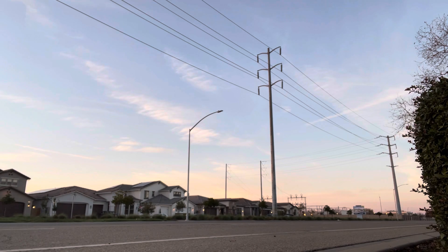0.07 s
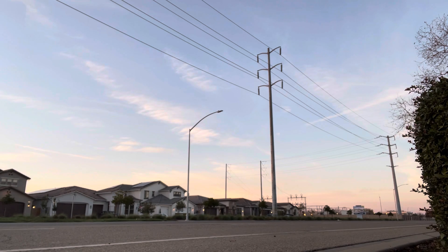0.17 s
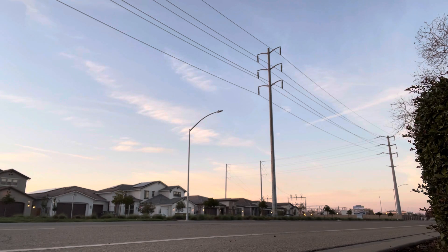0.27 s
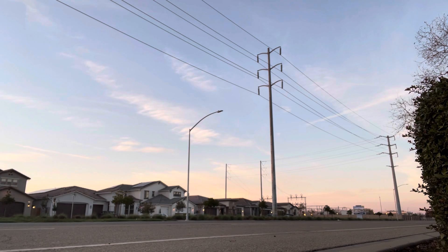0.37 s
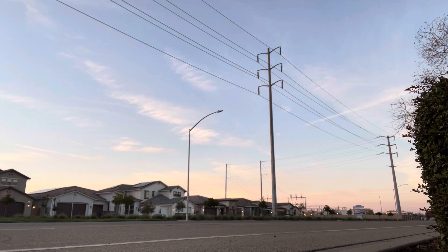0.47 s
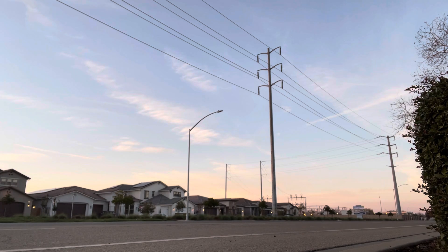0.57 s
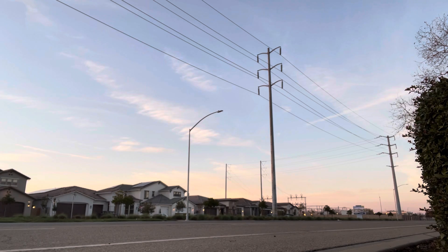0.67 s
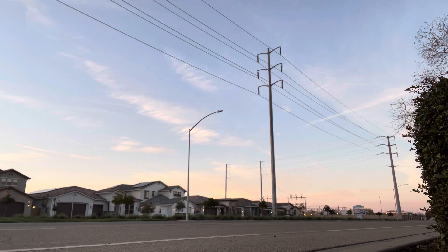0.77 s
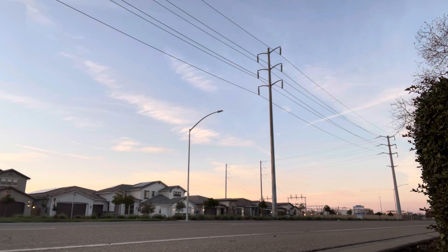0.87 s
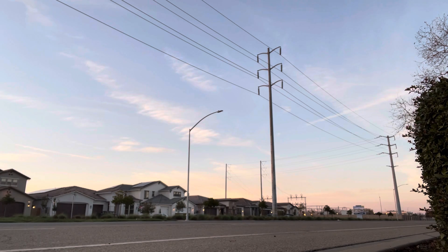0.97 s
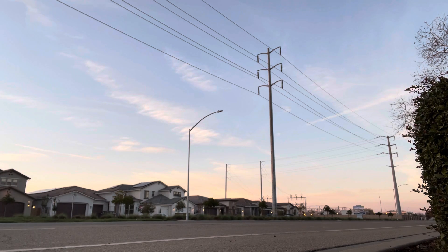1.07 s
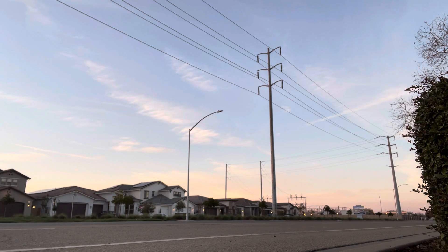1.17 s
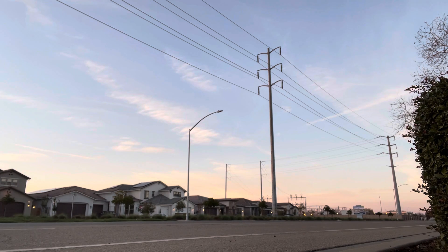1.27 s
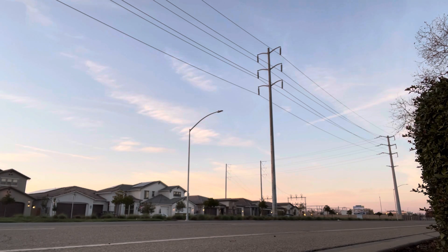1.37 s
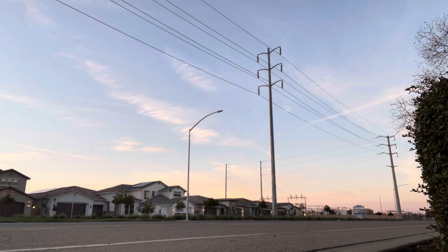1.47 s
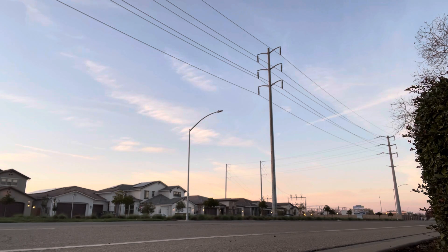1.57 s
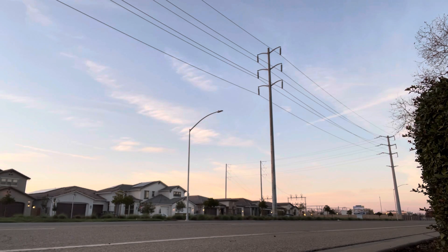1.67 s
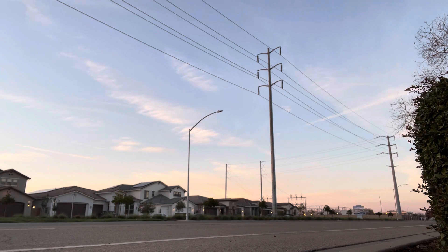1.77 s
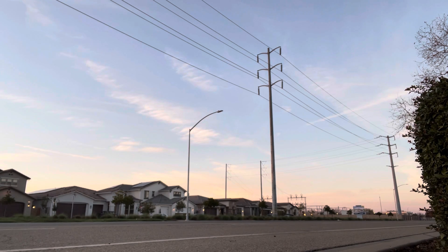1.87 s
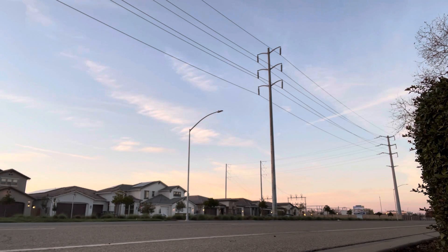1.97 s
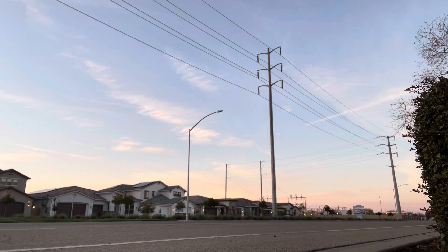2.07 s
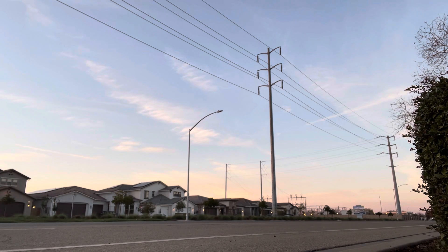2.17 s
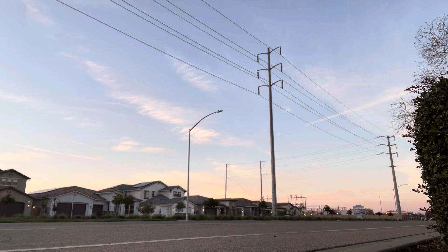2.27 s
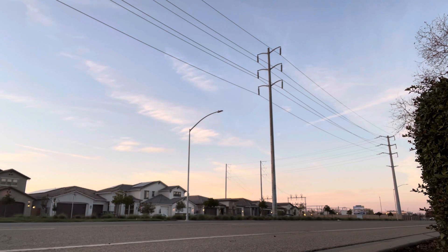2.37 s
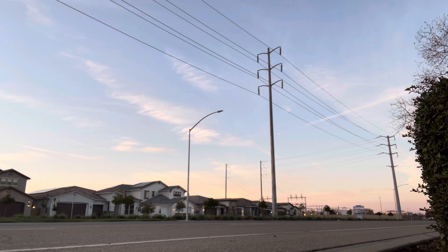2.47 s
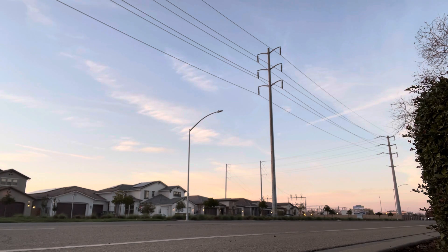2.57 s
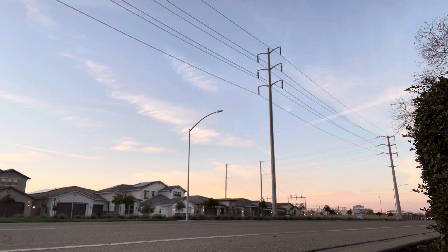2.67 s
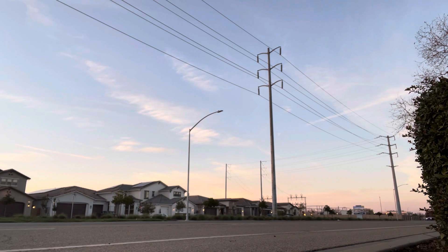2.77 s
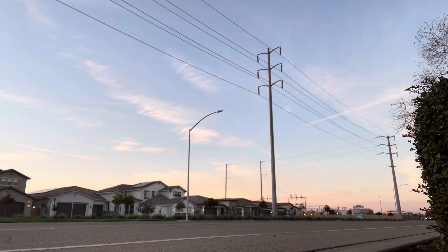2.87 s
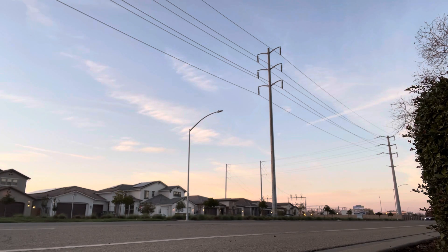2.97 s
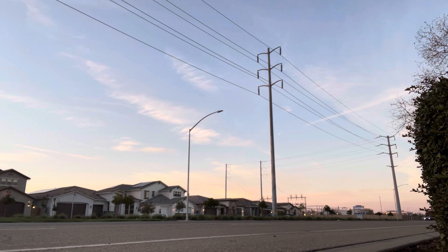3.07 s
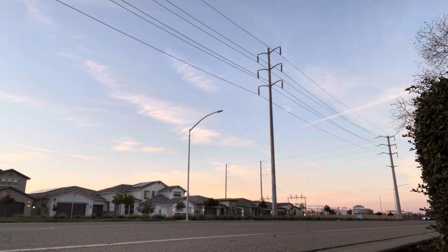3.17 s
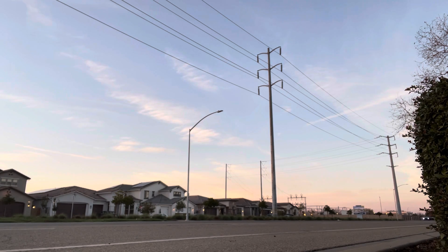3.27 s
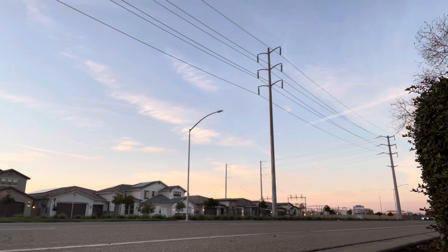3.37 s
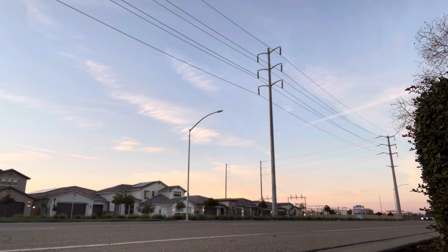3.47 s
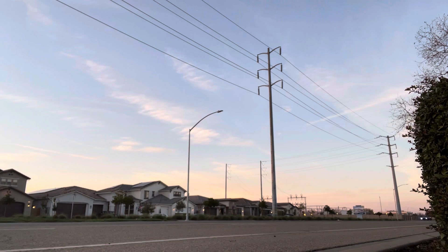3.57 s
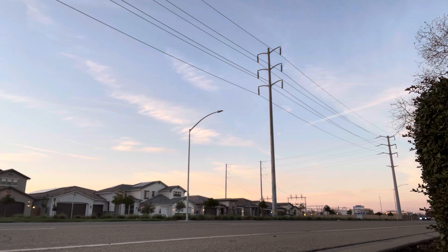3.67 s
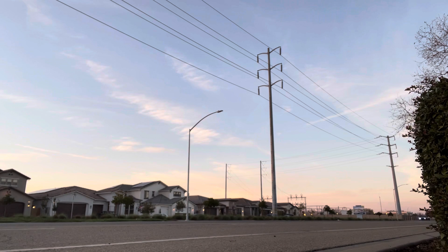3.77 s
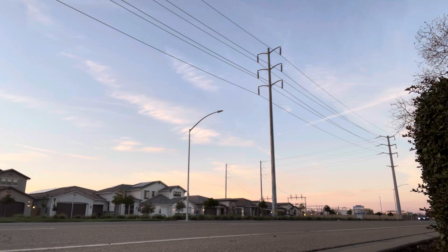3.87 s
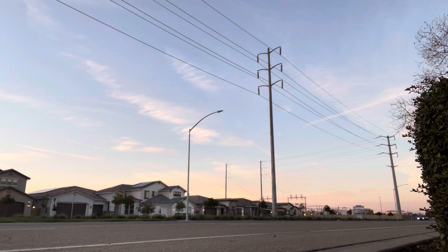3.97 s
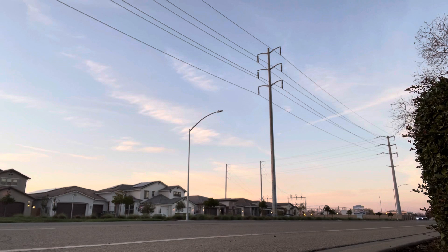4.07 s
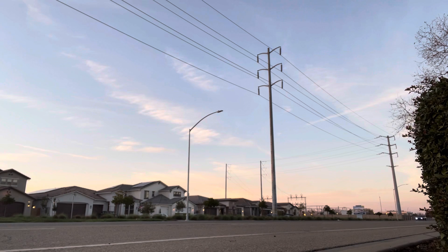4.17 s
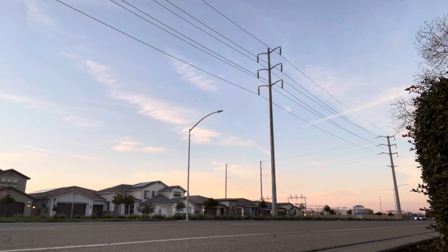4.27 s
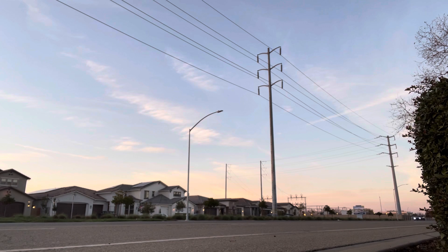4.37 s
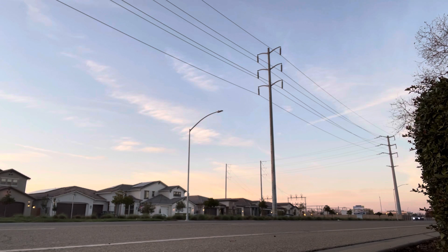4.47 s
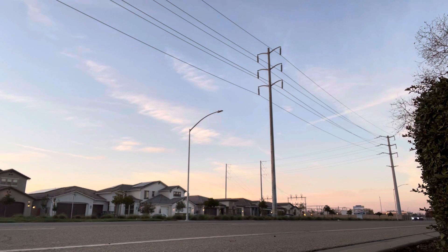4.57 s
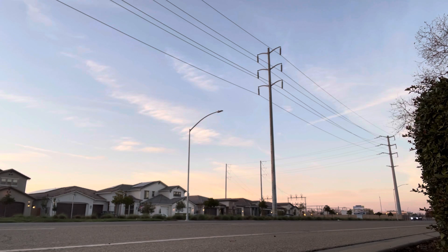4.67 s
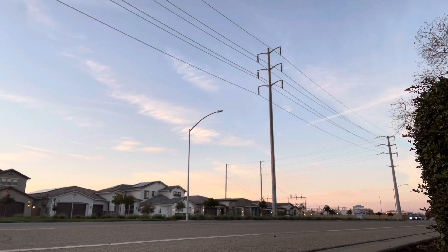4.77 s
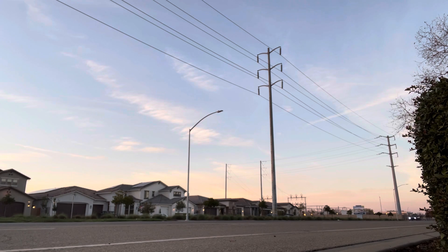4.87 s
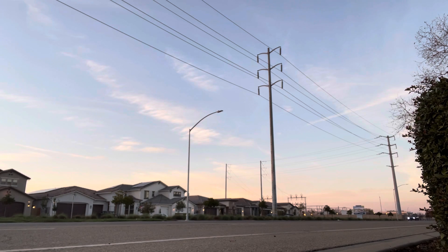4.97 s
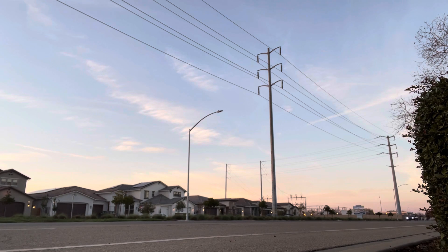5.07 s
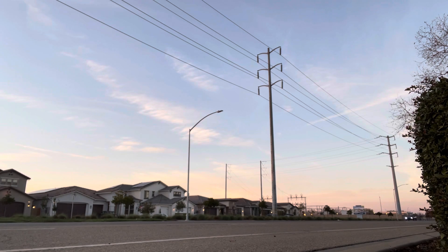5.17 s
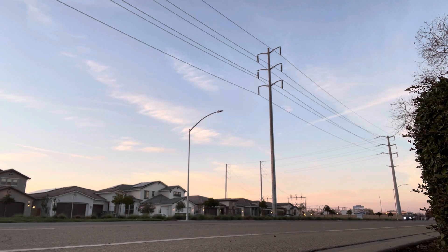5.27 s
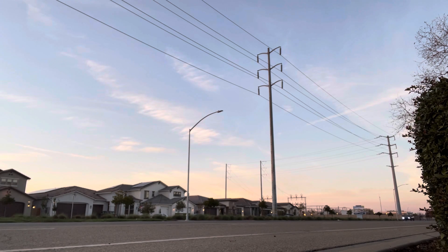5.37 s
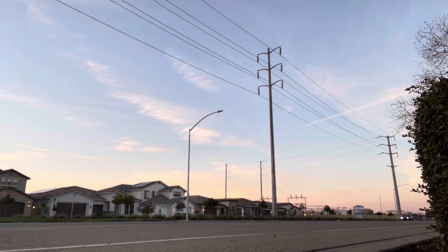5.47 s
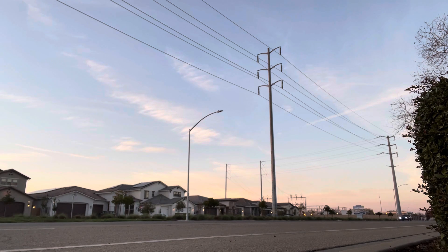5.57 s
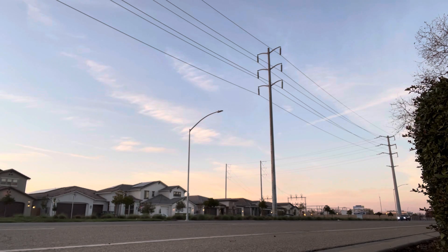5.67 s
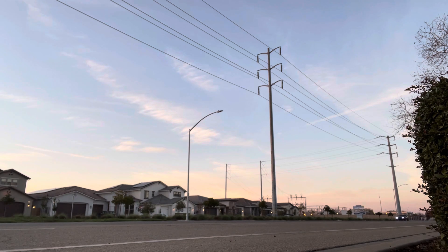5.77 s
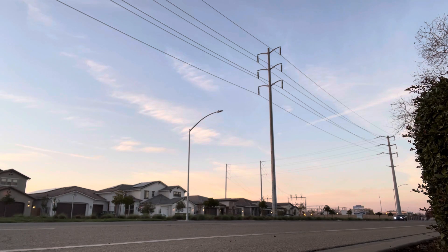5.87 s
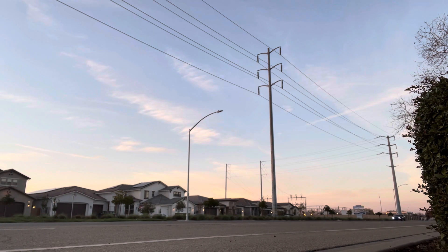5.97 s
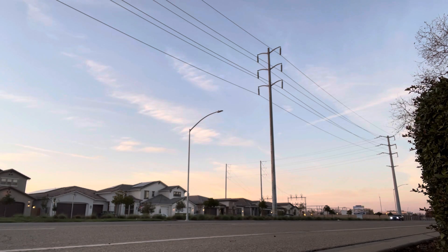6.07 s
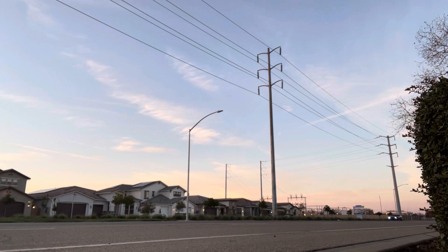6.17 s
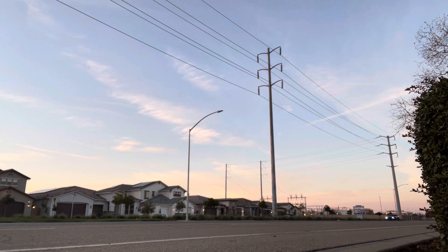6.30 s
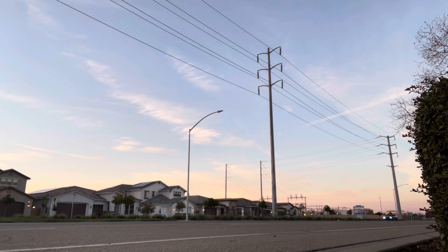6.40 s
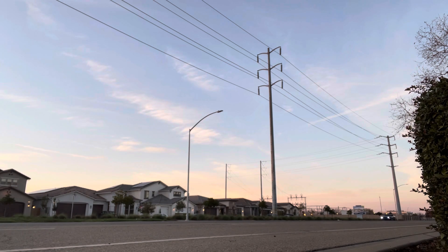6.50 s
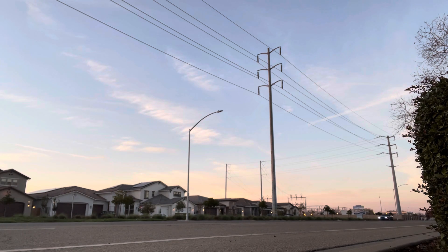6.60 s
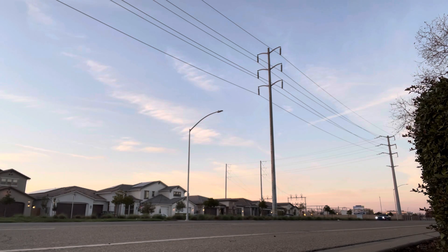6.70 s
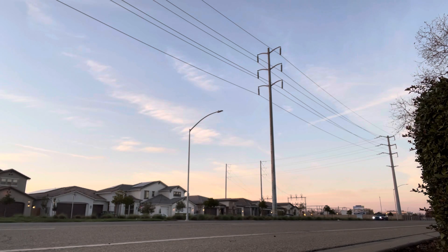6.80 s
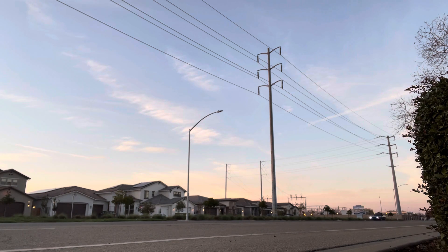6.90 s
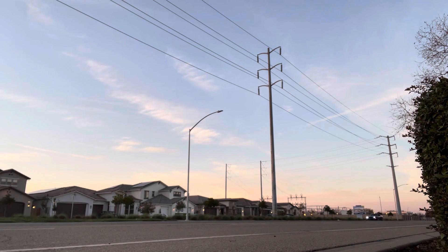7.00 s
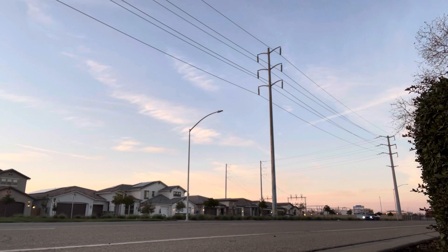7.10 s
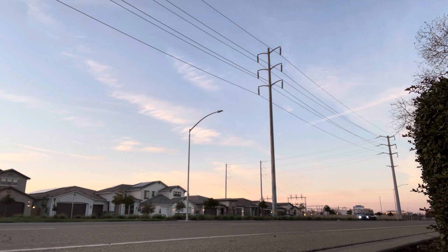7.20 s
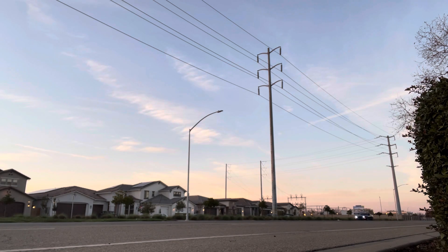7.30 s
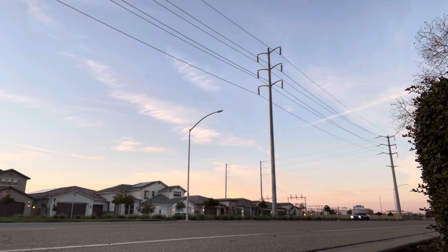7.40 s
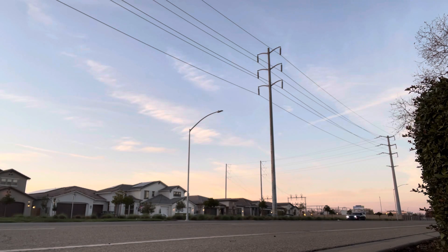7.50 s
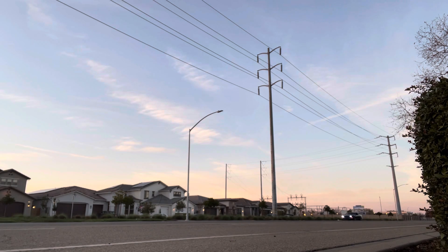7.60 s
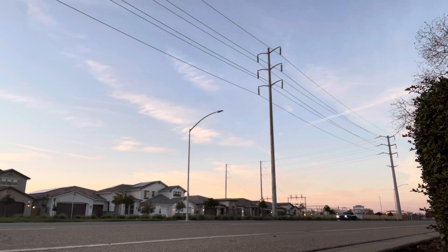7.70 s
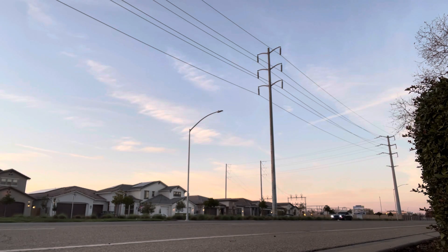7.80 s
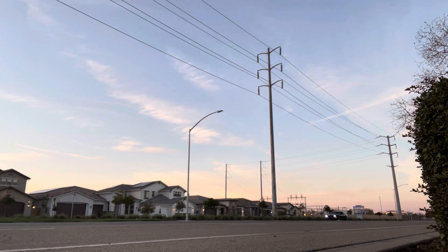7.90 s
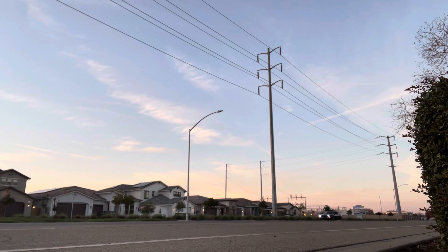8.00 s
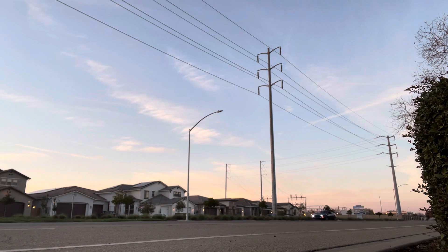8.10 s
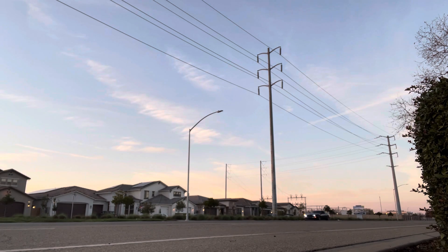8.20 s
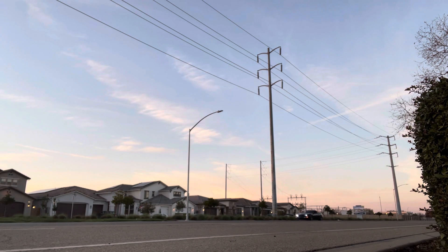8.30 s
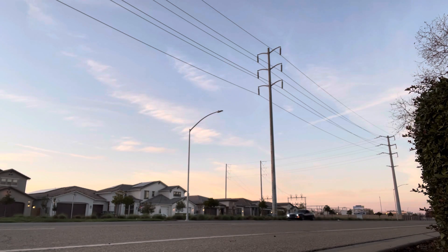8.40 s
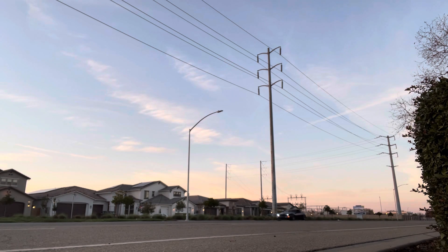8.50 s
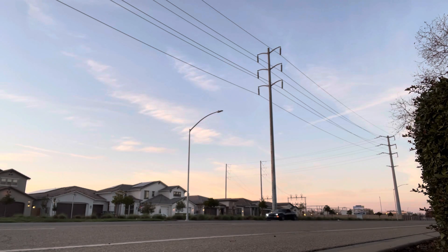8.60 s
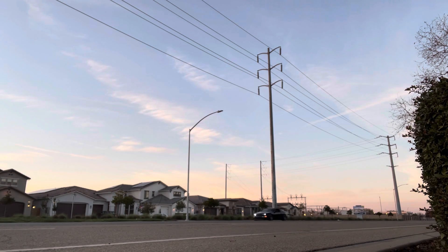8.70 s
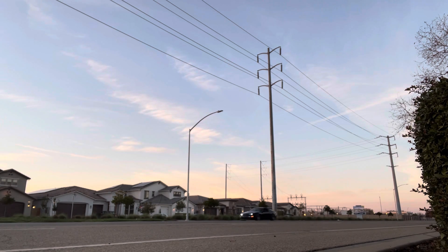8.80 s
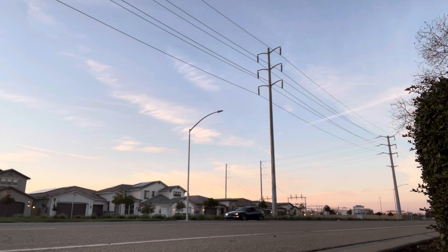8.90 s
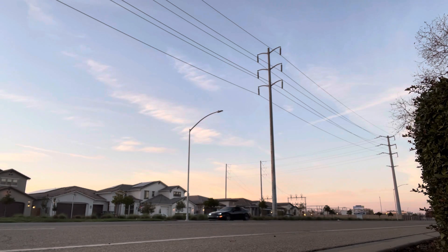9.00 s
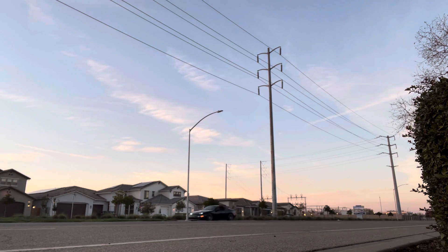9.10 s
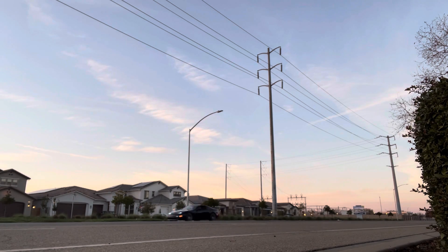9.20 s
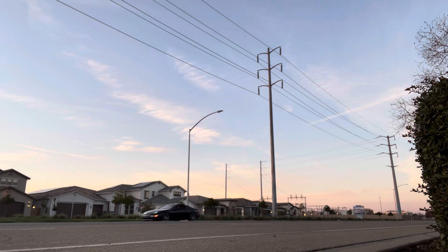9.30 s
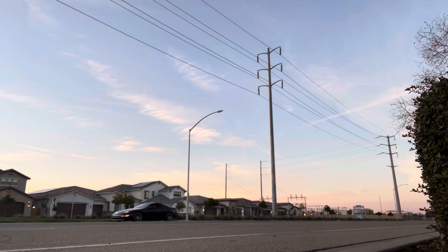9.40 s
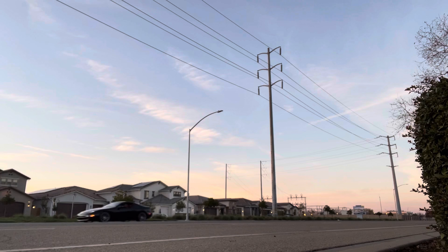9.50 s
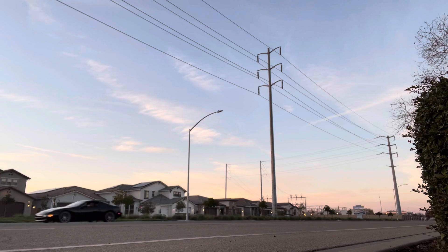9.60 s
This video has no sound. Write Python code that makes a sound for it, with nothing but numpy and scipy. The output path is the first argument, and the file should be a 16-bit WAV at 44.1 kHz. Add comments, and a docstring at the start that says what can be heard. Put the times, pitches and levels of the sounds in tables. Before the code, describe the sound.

A quiet suburban roadside heard from the kerb on a stereo phone. Soft low distant traffic and a steady mains hum run throughout, with faint, short, sometimes buzzy bird notes from nearby trees until about 7.3 s. Around 1.4 s a six-cylinder sports car far to the right blips its throttle, then pulls away; its low, hollow exhaust drone climbs continuously from 2.5 to 6 s, wavering and echoing off walls. A nearer bird gives a clear rising whistle on the left at 4.1 to 4.6 s. At 6 to 6.6 s the car lifts and shifts up, pitch falling, with several muffled exhaust thuds. It pulls again from 6.8 s, louder and raspier, tyre roar growing. Near 8.8 s it lifts off, with heavier thuds until 9.2 s, pitch sagging, tread sizzling around 9.35 s as it sweeps close past towards the left, still loud at the end near 9.6 s.

```python
"""At the kerb, on a phone with two microphone ports: distant traffic, a steady mains hum, and birds calling until
shortly before the car goes by. A V6 sports car far to the right blips, pulls away and revs out; its exhaust
drones on its firing orders, each firing a rasping pulse. It shifts up with late burns thudding in the pipe and
pulls again, tyres roaring, walls and house fronts echoing. Close by it lifts off and thuds again, the tread
sizzles, and it goes by to the left."""
import sys
import numpy as np
from scipy import signal
from scipy.fft import rfft, irfft, next_fast_len
from scipy.io import wavfile
from scipy.ndimage import uniform_filter1d, minimum_filter1d

SR = 44100
rng = np.random.default_rng(int(sys.argv[2]) if len(sys.argv) > 2 else 0)


def store_pcm(level_fs):
    """Save levels as 16-bit WAV."""
    pcm = np.round(np.clip(level_fs, -1, 1) * 32767).astype(np.int16)
    wavfile.write(sys.argv[1], SR, np.atleast_2d(pcm).T)


N = 425565
T = np.arange(N) / SR


def undb(db):
    """Decibels to gain."""
    return 10 ** (np.asarray(db) / 20)


def unit(x):
    """Scale to rms 1."""
    return x / np.sqrt(np.mean(x ** 2))


def curves(table):
    """Each column of a table, joined by straight lines in time."""
    s, *columns = np.transpose(table)
    return [np.interp(T, s, column) for column in columns]


def over_hz(table, hz):
    """Each column of a table, joined on a log-frequency axis."""
    points, *columns = np.transpose(table)
    return [np.interp(np.log(hz + 1), np.log(points), column) for column in columns]


def noise():
    """White noise."""
    return rng.standard_normal(N)


def colour(x, spectrum):
    """Give x a spectrum that falls away beyond its ends; rms 1."""
    size = next_fast_len(N)
    hz = np.arange(size // 2 + 1) * SR / size
    low_end = np.minimum(1, hz / spectrum[0][0]) ** 2
    high_end = 1 / np.maximum(1, hz / spectrum[-1][0]) ** 2
    gain = undb(over_hz(spectrum, hz)[0]) * low_end * high_end
    return unit(irfft(rfft(x, size) * gain, size)[:N])


def walk(rate):
    """Smooth chance of spread 1 that changes rate times a second."""
    step = max(1, int(SR / rate))
    points = rng.standard_normal(N // step + 2)
    joined = np.interp(np.arange(N) / step, np.arange(len(points)), points)
    return unit(uniform_filter1d(joined, step))


def tone(turns, db):
    """A sine of the given rms level on a phase in turns."""
    return np.sqrt(2) * undb(db) * np.sin(2 * np.pi * turns)


def arrive(table, swell_s=.3):
    """A gain that swells from nothing up to the first row of a curve."""
    return np.clip(1 + (T - table[0][0]) / swell_s, 0, 1) ** 3


def bump(s, width_s):
    """A bell-shaped swell of height 1 around a moment."""
    return np.exp(-((T - s) / width_s) ** 2)


# the two microphone ports, for a sound from the right:
# pitch_hz, left_minus_right_db, left_lag_rad, unrelated_share (0 to 1)
PORT_RESPONSE = [(50, 1.5, 0.2, .05), (84.6, 2.8, .2, 0.09), (114, -1.4, 0.35, 0.4), (235, -3.5, 1.64, 1),
                 (540, -5.5, 1.4, 0.93), (990, -9.5, 2.46, 0.16), (1330, -7.5, 2, 0.33),
                 (1980, -0.5, 2.15, 0.2), (2800, 5.5, 3.6, 0.42), (4340, 2, 7.5, 0.22), (8050, 2, 10.6, .2)]


def ports(x, bearing, scattered, shade=0.56, size=1024):
    """Two ports on a phone: the far one hears later and shaded; scattered sound differs between them."""
    hz, s, direct = signal.stft(x, SR, nperseg=size)
    spread = signal.stft(scattered, SR, nperseg=size)[2]
    pan_db, lag, share = (column[:, None] for column in over_hz(PORT_RESPONSE, hz))
    side, share = np.interp(s, T, bearing), np.clip(share, 0, 1)
    direct = direct * np.sqrt(1 - share / 2)
    spread = spread * np.sqrt(share / 2)
    # the ports face different ways, so part of the shading stays for a sound ahead
    pan_db = pan_db * np.minimum(1, shade + side)
    heard = []
    for sign in (1, -1):  # left, right
        shift = np.exp(-.5j * sign * side * lag)
        port = (direct + sign * spread) * undb(sign * pan_db / 2) * shift
        heard.append(signal.istft(port, SR, nperseg=size)[1][:N])
    return np.array(heard)


def houses(x, t60_s, hz, first_s=0.027):
    """House fronts send back a scattered echo that dies 60 dB in t60_s, dull above hz."""
    t = np.arange(SR) / SR
    tail = rng.standard_normal(SR) * undb(-60 * t / t60_s) * (t > first_s)
    tail = signal.sosfilt(signal.butter(2, hz, fs=SR, output="sos"), tail / np.linalg.norm(tail))
    return signal.fftconvolve(x, tail)[:N]


# colour of the distant traffic: pitch_hz, level_db
TOWN_COLOUR = [(25, -25.5), (50, -5), (80, 0.5), (140, 4.5), (190, -14.5), (320, -4.5), (450, -17),
               (620, -19), (900, -13.5), (1250, -17), (1600, -30), (2300, -37), (3500, -58), (12000, -62)]
TOWN_DB, HUM_HZ, HUM_DB = -43, 119.8, -42.5


def town():
    """Distant traffic down the road is coloured noise; the mains hum is one low, slightly wavering sine."""
    direct, scattered = (colour(noise(), TOWN_COLOUR) * undb(TOWN_DB + 0.5 * walk(1.5)) for _ in range(2))
    hum = tone(HUM_HZ * T + 0.043 * walk(8.8), HUM_DB + 1.0 * walk(12.0))
    return ports(direct + hum, np.ones(N), scattered)


# bird notes in the trees: start_s, length_s, start_hz, middle_hz, end_hz, level_db,
# buzz_depth, hoarse_depth (both relative)
BIRD_NOTES = [(.237, .032, 5950, 5250, 6000, -71, 0, 0), (.269, .016, 5600, 5050, 5700, -68, 0, 0),
              (.285, .018, 5500, 4900, 3600, -76, 0, 0), (.503, .016, 4100, 4900, 5300, -75, 0, .3),
              (.526, .03, 5600, 5850, 5650, -64, .9, .3), (1.757, .036, 6100, 5200, 5300, -73, 0, .1),
              (1.792, .026, 5450, 4950, 4600, -70, 0, .1), (1.815, .027, 6700, 6550, 5800, -78, 0, .3),
              (1.86, .06, 4800, 5650, 5450, -70, 1.2, .6), (2.757, .048, 4200, 5400, 5600, -60, .9, .5),
              (3.07, .07, 6000, 5600, 5100, -79, .3, .3), (3.27, .2, 6600, 7100, 7350, -67, 0, 0),
              (3.46, .24, 7100, 7550, 7800, -65, 0, 0), (3.425, .06, 4200, 4350, 4200, -76, .8, .4),
              (3.68, .028, 7850, 7700, 7100, -67, 0, 0), (3.93, .035, 6200, 5900, 5400, -77, 0, .6),
              (4.63, .028, 7950, 7700, 6700, -69, 0, 0), (4.135, .025, 8900, 8700, 8300, -72, 0, .3),
              (4.125, .13, 4700, 3950, 4250, -71, 0, 0), (4.26, .4, 6950, 7750, 7900, -67, 0, 0),
              (5.16, .12, 7000, 7400, 8200, -70, 0, 0), (6.06, .11, 6800, 7300, 8600, -65, 0, .2),
              (6.26, .16, 6000, 6350, 6300, -62, .1, 1), (6.97, .1, 6500, 6950, 8700, -57, 0, .3),
              (7.17, .17, 5900, 6300, 6700, -62, .1, 1), (7.25, .06, 3300, 3250, 2900, -63, 0, .3)]
# a nearer bird's rising whistle: time_s, pitch_hz, level_db
WHISTLE = [(4.12, 2175, -79), (4.19, 2226, -69), (4.31, 2322, -59.5), (4.37, 2416, -57.5),
           (4.43, 2632, -54), (4.51, 2827, -58.5), (4.58, 2893, -60.5), (4.64, 2968, -88)]
BIRD_ECHO_DB = -12


def birds(warble_db=2.5, buzz_hz=1180, wobble=0.0089, whistle_pan_db=8):
    """Short arched notes, some hoarse and ending in a buzz, from the trees; one clear whistle from the left."""
    out, waver, warble, scratch = np.zeros(N), walk(120), walk(90), walk(1500)
    buzz = np.sin(2 * np.pi * (buzz_hz * T + .1 * walk(300)))
    for s, length_s, start_hz, middle_hz, end_hz, db, buzzing, hoarse in BIRD_NOTES:
        u = np.linspace(0, 1, int(length_s * SR))
        at = int(s * SR) + np.arange(len(u))
        arch = np.polyfit([0, .5, 1], [start_hz, middle_hz, end_hz], 2)
        hz = np.polyval(arch, u) * (1 + wobble * waver[at])
        hz = hz + buzz_hz * (1.5 * buzzing * u * buzz[at] + .3 * hoarse * scratch[at])
        swell = np.sqrt(np.abs(np.sin(np.pi * u)))
        out[at] += tone(np.cumsum(hz) / SR, db + warble_db * warble[at]) * swell
    hz, db = curves(WHISTLE)
    whistle = tone(np.cumsum(hz) / SR, db) * (T > WHISTLE[0][0]) * (T < WHISTLE[-1][0])
    echo = np.array([houses(out + whistle, .4, 9000, first_s=.008) for _ in range(2)])
    # the trees stand a little to one side: their notes reach the right port two samples later
    notes = np.array([out, np.roll(out, 2)])
    whistle_gain = undb(np.array([[1], [-1]]) * whistle_pan_db / 2)
    return notes + whistle * whistle_gain + undb(BIRD_ECHO_DB) * echo


# walls mirror the exhaust while the car is opposite them:
# delay_s, level_db, opposite_s, half_width_s
WALL_ECHOES = [(.13, -12, 5, .7), (.48, -14, 4.3, .9), (.45, -15, 8, .6)]


def walls(x):
    """Walls down the road send back late copies; while revs climb, their lower pitch beats with the direct note."""
    out = 0
    for delay_s, db, s, width_s in WALL_ECHOES:
        out = out + np.interp(T - delay_s, T, x, left=0) * undb(db) * bump(s, width_s)
    return out


# the sizzle of the tread: pitch_hz, level_db
TREAD_COLOUR = [(2400, -12.5), (3100, 2), (4000, 5), (5000, -2.5), (6500, -24)]
TREAD_S, TREAD_WIDTH_S, TREAD_DB = 9.35, .2, -48.5


def tread():
    """Air squeezed out of the tyre tread sizzles as the wheels go by."""
    return colour(noise(), TREAD_COLOUR) * undb(TREAD_DB + 1.5 * walk(41)) * bump(TREAD_S, TREAD_WIDTH_S)


# where the car is from the kerb: time_s, bearing (1 = far right, 0 = ahead, negative = left)
BEARING = [(0, 0.92), (4, 0.9), (7, 0.92), (8, 0.76), (8.5, 0.57), (8.9, 0.26), (9.2, -0.17), (9.5, -0.22),
           (9.65, -0.66)]
# how near the car is to the phone: time_s, level_db (0 = the reference for a close pass)
NEARNESS = [(1.12, -31), (3.6, -28.5), (5, -18.5), (5.6, -12.5), (6.35, -14), (7.1, -12), (7.9, -6),
            (8.6, -3), (9.05, -4), (9.4, -0.5), (9.65, 2)]
# levels at 0 dB nearness and cruising revs, all revs as bank firing rate
ROAR_DB, BAY_DB, AIR_DB, CRUISE_HZ = -23, -37, -49, 120
BAY_DB_PER_OCTAVE, AIR_DB_PER_OCTAVE = 5.5, 13.5
QUIETEST_HZ = 70  # below these revs bay and air get no quieter
AIR_FADE = 1.05  # the hiss of air follows nearness this many times as strongly, in dB
BAY_BEHIND_DB = -12  # at bearing -1: the body hides the engine bay once the car has gone by
# the hiss swells as the car draws level
ABREAST_S, ABREAST_WIDTH_S, ABREAST_DB = 9.41, 0.69, 6


def rush_levels(bank_hz):
    """Levels in dB of tyres, engine bay and air: all grow as the car nears, the last two also with the revs."""
    near_db, = curves(NEARNESS)
    gone_by = np.maximum(0, -curves(BEARING)[0])
    octaves = np.log2(np.maximum(bank_hz, QUIETEST_HZ) / CRUISE_HZ)
    bay_db = near_db + BAY_DB + BAY_DB_PER_OCTAVE * octaves + BAY_BEHIND_DB * gone_by
    air_db = AIR_FADE * near_db + AIR_DB + AIR_DB_PER_OCTAVE * octaves
    air_db = air_db + ABREAST_DB * bump(ABREAST_S, ABREAST_WIDTH_S)
    return near_db + ROAR_DB, bay_db, air_db


# colours of tyre roar, engine bay and hissing air: pitch_hz, level_db
ROAR_COLOUR = [(250, -19), (420, -6), (600, -4), (800, -1), (1050, 1.5), (1300, -5.5), (1550, -15),
               (2200, -43.5)]
BAY_COLOUR = [(1100, -20), (1550, 4.5), (2000, 5), (2300, 4.5), (2550, -2.5), (2900, -6), (3800, -28)]
AIR_COLOUR = [(2200, -14), (2600, 5.5), (3050, 6.5), (3850, 5.5), (4700, -2), (6300, -3.5), (7700, -8),
              (8800, -34), (11000, -19), (13000, -29)]


def rolling(puff, roar_db, bay_db, air_db):
    """Tyre roar is steady noise; engine bay and air are noise pulsed once a firing."""
    roar = colour(noise(), ROAR_COLOUR) * undb(roar_db + 0.17 * walk(16))
    bay = colour(noise() * puff, BAY_COLOUR) * undb(bay_db + 1.5 * walk(19))
    air = colour(noise() * puff, AIR_COLOUR) * undb(air_db)
    return (roar + bay + air) * arrive(NEARNESS)


# colours of the gas rumble and of the rasp: pitch_hz, level_db
RUMBLE_COLOUR = [(25, -31), (45, -12.5), (80, -6.5), (130, -1.5), (230, 3.5), (330, -11), (500, -9),
                 (800, -32.5)]
RASP_COLOUR = [(280, -21.5), (450, 4), (580, 10.5), (850, 5.5), (1100, -16.5), (1400, -11.5), (1700, -28.5),
               (2300, -26.5), (3200, -48)]


def pipe_gas(puff, rumble_db, rasp_db):
    """Gas leaves the pipe in puffs, one a firing, as a low rumble and a rasping noise."""
    rumble = colour(noise() * puff, RUMBLE_COLOUR) * undb(rumble_db)
    rasp = colour(noise() * puff, RASP_COLOUR) * undb(rasp_db + 0.61 * walk(18))
    return rumble + rasp


# the foot comes off the throttle: start_s, end_s, firing_note_change_db, overtone_change_db
LIFTS = [(1.55, 1.629, -12, 2), (6.02, 6.454, -14.5, -6), (8.842, 9.253, -7.5, -8.5)]
THROTTLE_S = 0.14  # time the throttle takes to close or open


def lifted(start_s, end_s):
    """How far the throttle is shut, 0 to 1, with ramps; a very short lift does not reach 1."""
    return np.clip(.5 + np.minimum(T - start_s, end_s - T) / THROTTLE_S, 0, 1)


# belt and chain whine: order (multiple of the four-stroke cycle),
# level_db (against the whine level), slack_change_db (around the last lift)
WHINE_ORDERS = [(42, -7, 0), (46.6, -6, 8), (47.3, -5, 0), (51, -5, 3), (54, -2, -2), (57, -3, 0),
                (60, -1, 0), (63, -1, 0)]
WHINE_DB, SLACK_S = -12, .25  # level against the engine bay; half width of the slack


def whine(cycle, cycle_hz, bay_db):
    """Thin lines from belts and chains that follow the revs and fade outside the engine bay's resonance."""
    out, slack = 0, bump(LIFTS[-1][0], SLACK_S)
    for order, db, slack_db in WHINE_ORDERS:
        resonance_db = over_hz(BAY_COLOUR, order * cycle_hz)[0]
        level_db = bay_db + WHINE_DB + db + slack_db * slack + resonance_db
        out = out + tone(order * cycle + .06 * walk(40), level_db + 2 * walk(25))
    return out


# late burns of unburnt fuel in the pipe:
# start_s, level_db (before attack and decay), pitch_hz (centre of the sag), decay_s
LATE_BURNS = [(5.988, -20, 97, 0.016), (6.059, -21.5, 110, 0.019), (6.134, -19, 111, 0.016),
              (6.239, -16.5, 112, 0.014), (6.399, -15, 125, 0.043), (6.54, -16, 121, 0.036),
              (8.803, -15, 104, 0.028), (8.845, -14.5, 119.6, 0.04), (8.956, -12, 101, 0.008),
              (9.038, -11.5, 122.6, 0.036), (9.193, -8, 126, 0.024), (9.221, -14, 96, 0.02)]


def thuds(sag=0.33, attack_s=0.0065, gas=0.57):
    """Each late burn booms in the silencer and sags in pitch as it dies."""
    out, rumble = np.zeros(N), colour(noise(), RUMBLE_COLOUR)
    t = np.arange(SR // 4) / SR
    for s, db, hz, decay_s in LATE_BURNS:
        at = int(s * SR)
        decay = np.exp(-t / decay_s)
        turns = hz * np.cumsum(1 + sag * (2 * decay - 1)) / SR
        boom = np.sin(2 * np.pi * turns) + gas * rumble[at:at + len(t)]
        out[at:at + len(t)] += undb(db) * boom * (1 - np.exp(-t / attack_s)) * decay
    return out


def firings(cycle, scatter_db=1.5, weak_bank_db=-5):
    """One pressure pulse a firing, the two banks in turn, one weaker, no two pulses alike."""
    count = np.floor(6 * cycle)
    at = np.flatnonzero(np.diff(count))
    pulses = np.zeros(N)
    pulses[at] = undb(scatter_db * rng.standard_normal(len(at)) + weak_bank_db * (count[at] % 2))
    return pulses


# before throbs, each: time_s, level_db; the firing note is before lifts and dips too
# note of one cylinder bank, the octave below the firing note, which comes in at high revs
BANK_NOTE = [(1.5, -63), (2.8, -52), (3.4, -41), (4.1, -48), (4.75, -54), (5.25, -25.5), (5.55, -21),
             (5.95, -20), (6.01, -33.5), (6.28, -26), (6.47, -39), (6.58, -27), (6.75, -30), (7.15, -26),
             (7.9, -26.5), (8.35, -19.5), (8.7, -18.5), (8.83, -37), (9.3, -31), (9.6, -42.5)]
# note of all six cylinders firing
FIRING_NOTE = [(1.351, -49.5), (1.5, -28.5), (1.8, -20), (2.5, -18.5), (2.75, -22), (2.95, -28), (3.3, -25),
               (3.6, -21), (4.4, -18), (4.9, -21.5), (5.2, -22.5), (5.4, -27), (5.7, -24), (5.87, -29),
               (5.98, -23.5), (6.5, -20), (6.78, -17), (7.12, -14.5), (7.33, -20), (7.5, -20), (7.7, -14),
               (8.3, -11.5), (8.55, -14), (8.76, -13), (8.9, -15), (9.06, -15.5), (9.15, -11), (9.3, -16),
               (9.44, -12.5), (9.65, -16.5)]
# third harmonic of the bank note
THIRD_NOTE = [(1.6, -55.5), (2.551, -54), (3.35, -31), (4.05, -47.5), (4.299, -41), (5.6, -43.5),
              (6.42, -48), (6.58, -34), (7.049, -31.5), (7.2, -42), (7.5, -22.5), (7.8, -37), (8.35, -26.5),
              (8.68, -27.5), (8.9, -48.5), (9.35, -44), (9.5, -24.5), (9.65, -40)]
# fourth harmonic of the bank note, the octave of the firing note
FOURTH_NOTE = [(1.6, -54), (1.85, -37), (2.3, -41), (2.65, -28), (2.95, -26.5), (3.3, -38.5), (3.8, -34.5),
               (4.3, -46.5), (4.65, -38.5), (5.3, -34.5), (5.6, -42.5), (5.9, -39.5), (6.04, -43),
               (6.14, -34.5), (6.28, -35), (6.38, -41.5), (6.55, -30.5), (6.78, -27), (7, -32.5),
               (7.8, -27.5), (8.3, -32), (8.57, -26), (8.85, -35), (9.1, -39), (9.33, -44), (9.43, -24.5),
               (9.5, -32), (9.65, -25.5)]
# the rest of the exhaust, overtones before lifts: time_s, overtone_db, rasp_db, rumble_db
EXHAUST_LEVELS = [(1.3, -61, -64.5, -52.5), (1.75, -43.5, -52, -47), (2.2, -47.5, -54.5, -44.5),
                  (2.75, -42, -44.5, -44), (3.2, -41.5, -41, -44), (3.8, -48.5, -52.5, -37.5),
                  (4.3, -46.5, -49.5, -41.5), (4.9, -47.5, -46.5, -32.5), (5.45, -37.5, -49.5, -33.5),
                  (5.92, -36, -48.5, -29), (6.55, -39.5, -44, -36.5), (7.15, -37.5, -38, -32),
                  (7.8, -35.5, -37.5, -28.5), (8.3, -34.5, -34, -29.5), (8.65, -36.5, -27, -22.5),
                  (9, -35.5, -28.5, -28), (9.45, -34, -36.5, -22.5), (9.65, -38, -51, -24)]
# the firing note dips briefly: time_s, half_width_s, change_db
FIRING_DIPS = [(2.88, 0.035, -9), (3.04, .02, -11.5), (3.26, 0.016, -12), (3.439, 0.03, -14),
               (3.775, .025, -7), (3.92, .02, -5), (4.04, .018, -6), (4.18, 0.021, -10.5),
               (4.65, .022, -12), (4.755, .022, -10), (4.86, .022, -13), (4.975, 0.028, -15),
               (5.055, .016, -11), (5.16, .02, -11), (5.27, .02, -8), (6.845, 0.016, -17.5),
               (7.245, 0.025, -11), (7.39, .02, -11), (7.98, .02, -12), (8.07, .035, -11), (8.61, 0.03, -9),
               (8.93, .04, -7), (9.22, .024, -14)]
THROB_DB, THROB_HZ = 1.2, 16  # all four notes throb at random
# off the throttle the cylinders fire unevenly in strength, and in time by parts of a cycle
BURBLE_DB, BURBLE_HZ, STUMBLE_CYCLES = 3.5, 40, .005


def exhaust_levels():
    """Levels in dB; off the throttle firing note and overtones change level, all tones and the rumble burble."""
    notes = (BANK_NOTE, FIRING_NOTE, THIRD_NOTE, FOURTH_NOTE)
    bank_db, firing_db, third_db, fourth_db = (curves(note)[0] + THROB_DB * walk(THROB_HZ) for note in notes)
    overtone_db, rasp_db, rumble_db = curves(EXHAUST_LEVELS)
    unsteady_db, burble_db = BURBLE_DB * walk(BURBLE_HZ), 0
    for start_s, end_s, note_change_db, overtone_change_db in LIFTS:
        shut = lifted(start_s, end_s)
        firing_db = firing_db + note_change_db * shut
        overtone_db = overtone_db + overtone_change_db * shut
        burble_db = burble_db + unsteady_db * shut
    firing_db = firing_db + sum(db * bump(s, width_s) for s, width_s, db in FIRING_DIPS)
    tones_db = [db + burble_db for db in (bank_db, firing_db, third_db, fourth_db, overtone_db)]
    return *tones_db, rasp_db, rumble_db + burble_db


# unequal cylinders: order (multiple of the four-stroke cycle),
# level_db (against the bank note, or the firing note plus uneven_db where that is lower)
LOW_ORDERS = [(2, -12), (4, -14), (5, -9), (7, -14)]
# exhaust overtones: order (multiple of the four-stroke cycle), level_db (against the overtone level)
HIGH_ORDERS = [(8, 0), (10, -10), (11, -1), (13, -11), (14, -5), (15, -8), (16, -12), (17, -9), (18, 1),
               (21, -10), (24, -7)]
# resonances of silencer and tailpipe: pitch_hz, level_db
PIPE_RESONANCE = [(110, -12), (180, 5), (215, 7), (260, 3), (300, -3), (350, 0), (410, 0), (470, -2),
                  (555, 2.5), (630, 2.5), (740, 0), (820, -10), (950, -10), (1100, -15)]
# sharpness of the pressure pulses, softer in the higher gear: time_s, overtone_slope_db_per_octave
PULSE_EDGE = [(1.8, 3), (2.6, -1), (4.4, 2.5), (5.8, -1), (6.7, -11), (8.7, -12), (9.6, -2)]
PIPE_BASS_HZ, PIPE_BASS_DB_PER_OCTAVE = 88, 16  # the tailpipe radiates the lowest orders poorly


def drone(cycle, cycle_hz, bank_db, firing_db, third_db, fourth_db, overtone_db, uneven_db=-4, fading_db=2):
    """Six firings a cycle, three a bank; unequal cylinders add orders between, swept through pipe resonances."""
    notes = (bank_db, firing_db, third_db, fourth_db)
    out = sum(tone(3 * k * cycle, db) for k, db in enumerate(notes, 1))
    # the low in-between orders stay under both main notes
    under_db = np.minimum(bank_db, firing_db + uneven_db)
    partials = []
    for order, db in LOW_ORDERS:
        bass_octaves = np.minimum(0, np.log2(order * cycle_hz / PIPE_BASS_HZ))
        partials.append((order, under_db + db + PIPE_BASS_DB_PER_OCTAVE * bass_octaves))
    slope_db, = curves(PULSE_EDGE)
    for order, db in HIGH_ORDERS:
        tilt_db = slope_db * np.log2(order / 12)
        partials.append((order, overtone_db + db + tilt_db + over_hz(PIPE_RESONANCE, order * cycle_hz)[0]))
    for order, db in partials:
        # uneven firing blurs the high orders most; each order fades in and out on its way over the road
        turns = order * (cycle + .0018 * walk(18)) + rng.random()
        out += tone(turns, db + fading_db * walk(9))
    return out


# a blip, the launch, first gear, the upshift, second gear, the fall as it passes:
# time_s, bank_hz (firing rate of one cylinder bank as heard at the kerb)
REVS = [(1.35, 31.9), (1.52, 46.3), (1.58, 30.5), (1.8, 43.6), (1.93, 44.97), (2.31, 41.27), (2.45, 46.13),
        (2.9, 54.82), (4.0, 84.67), (5.1, 123.4), (5.94, 160.7), (6.08, 149.1), (6.3, 134.4), (6.53, 124),
        (6.7, 102.1), (6.77, 101.1), (6.86, 105.6), (7.81, 121.6), (8.76, 139), (8.86, 132), (9.04, 123.8),
        (9.15, 117.6), (9.35, 107.1), (9.51, 91.54), (9.65, 93.8)]
ECHO_T60_S, ECHO_HZ, ECHO_DB = 1.0, 835, -15


def car(crack_db=-7, side_echo_db=-7, chop=0.22):
    """Exhaust notes, rasp, whine and rolling noise travel together from right to left."""
    bank_hz, = curves(REVS)
    *notes_db, rasp_db, rumble_db = exhaust_levels()
    roar_db, bay_db, air_db = rush_levels(bank_hz)
    cycle_hz = bank_hz / 3
    cycle = np.cumsum(cycle_hz) / SR
    puff = 1 + chop * np.cos(2 * np.pi * 6 * cycle)  # one a firing
    shut = sum(lifted(*lift[:2]) for lift in LIFTS)
    stumble = STUMBLE_CYCLES * walk(BURBLE_HZ) * shut

    exhaust = drone(cycle + stumble, cycle_hz, *notes_db) * arrive(REVS) + thuds()
    exhaust += colour(firings(cycle), RASP_COLOUR) * undb(rasp_db + crack_db)

    # two independent draws of the noise: one heard from the car's bearing, one scattered
    direct, scattered = (rolling(puff, roar_db, bay_db, air_db) + pipe_gas(puff, rumble_db, rasp_db) + tread()
                         for _ in range(2))
    direct += exhaust + walls(exhaust) + whine(cycle, cycle_hz, bay_db)
    direct += undb(ECHO_DB) * houses(exhaust, ECHO_T60_S, ECHO_HZ)
    scattered += undb(side_echo_db) * houses(exhaust, ECHO_T60_S, ECHO_HZ)
    return ports(direct, *curves(BEARING), scattered)


def scene():
    """The town, the birds and the car, as they reach the kerb."""
    return town() + birds() + car()


CEILING, LIMITER_S, TOP_HZ = .85, .01, 13000  # peak against full scale, smoothing time, treble cut


def record(dry):
    """The phone holds down the loudest peaks and cuts the top."""
    size = int(LIMITER_S * SR)
    room = CEILING / np.maximum(np.abs(dry).max(axis=0), CEILING)
    gain = uniform_filter1d(minimum_filter1d(room, 2 * size), size)
    return signal.sosfilt(signal.ellip(8, .2, 70, TOP_HZ, fs=SR, output="sos"), dry * gain)


dry = scene()
out = record(dry)
store_pcm(out)
```